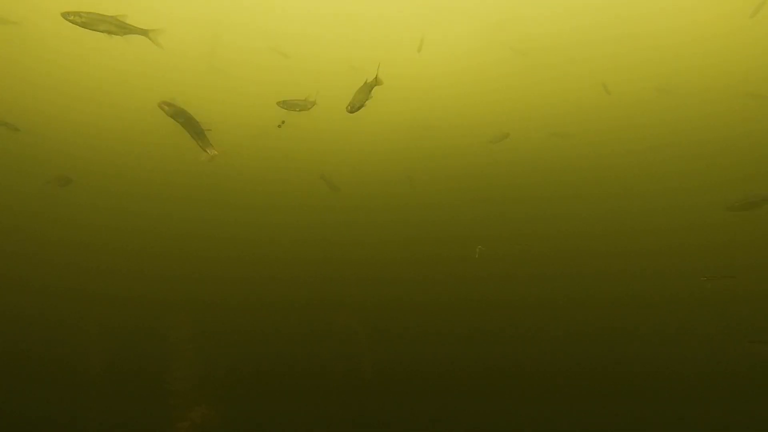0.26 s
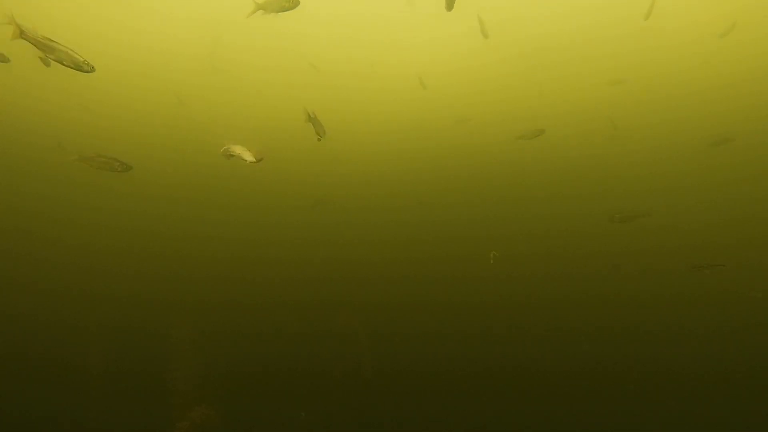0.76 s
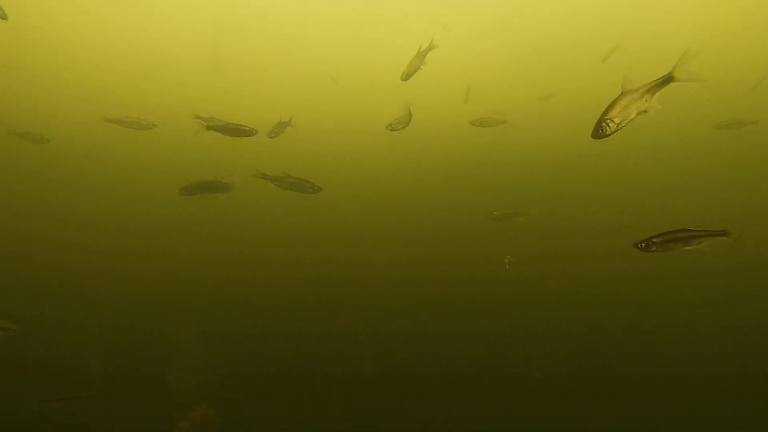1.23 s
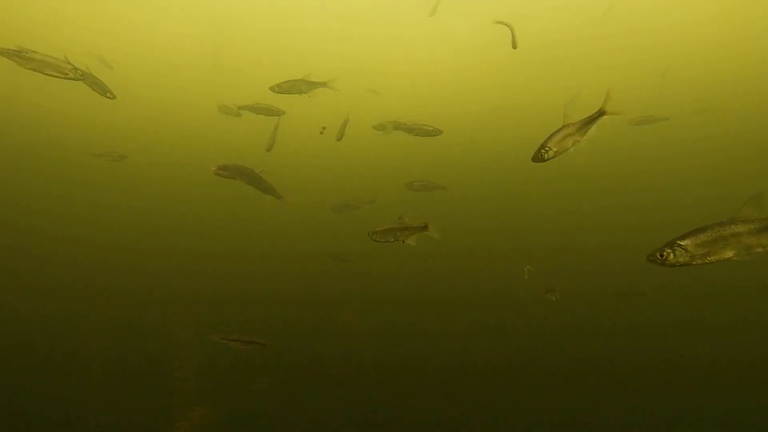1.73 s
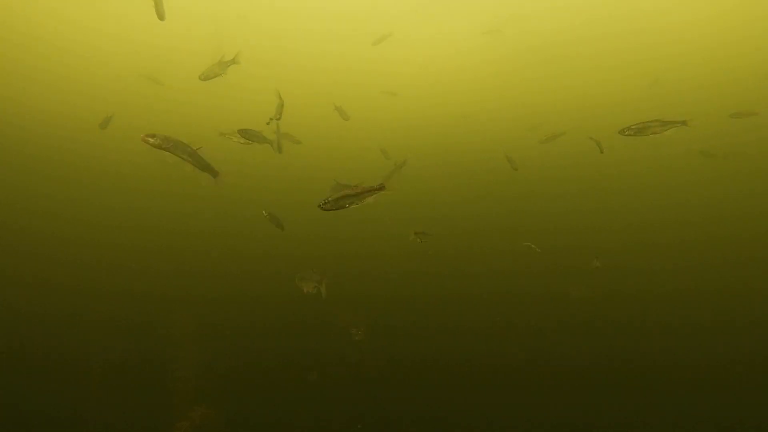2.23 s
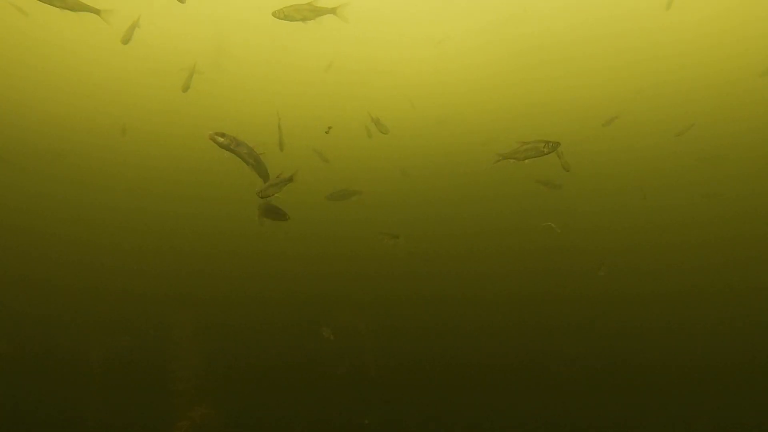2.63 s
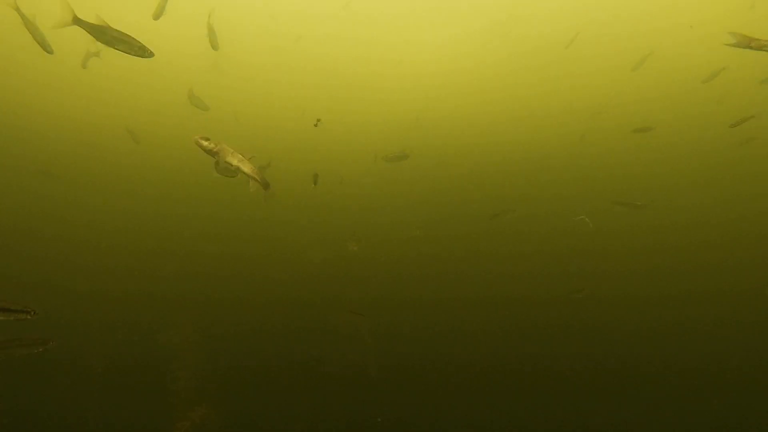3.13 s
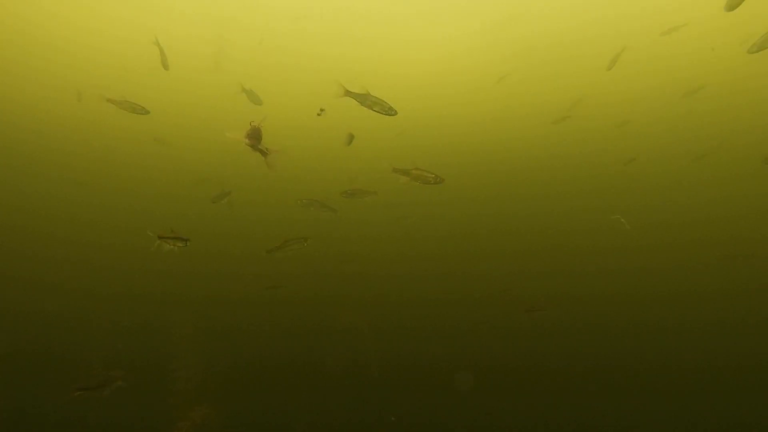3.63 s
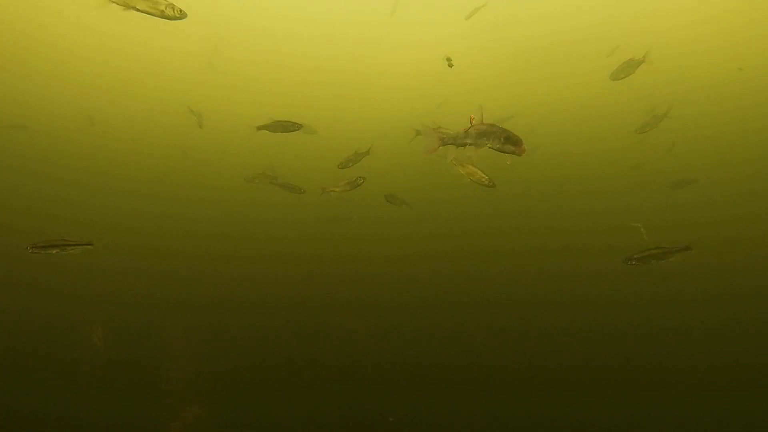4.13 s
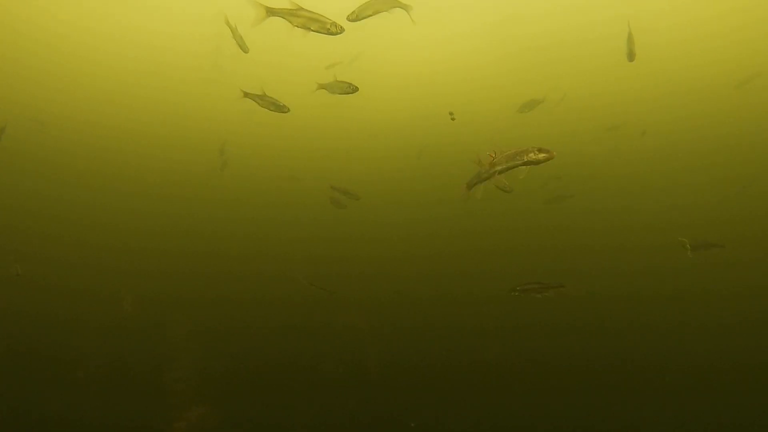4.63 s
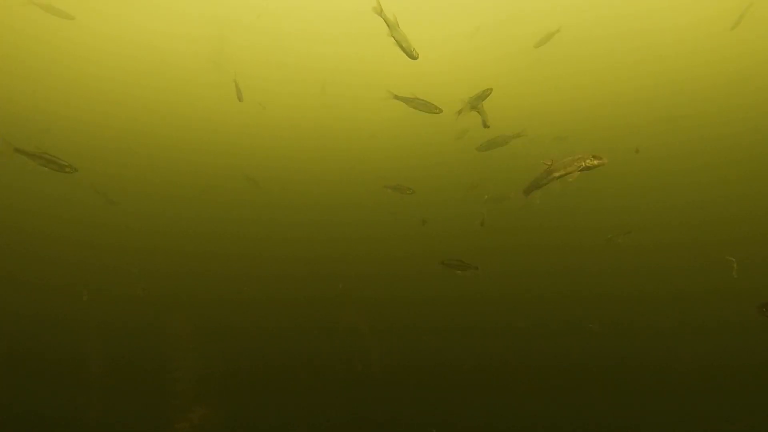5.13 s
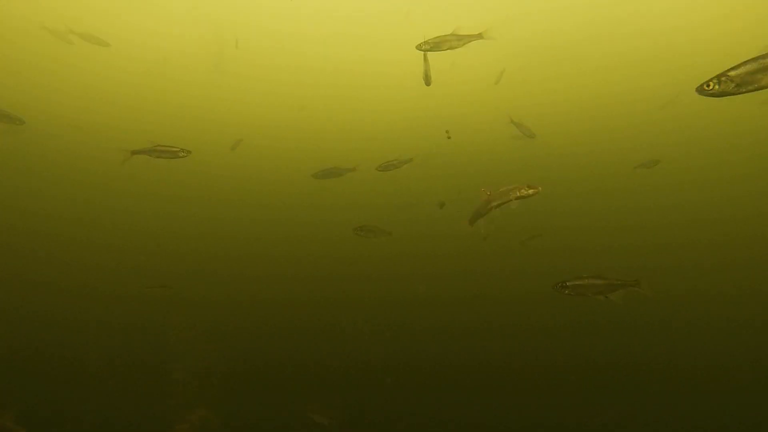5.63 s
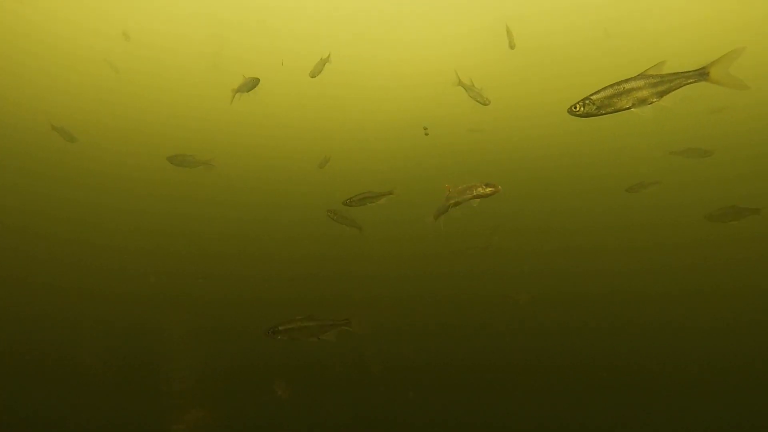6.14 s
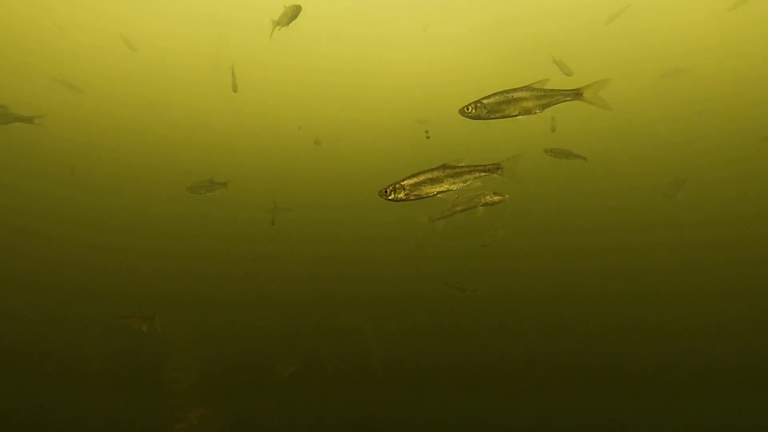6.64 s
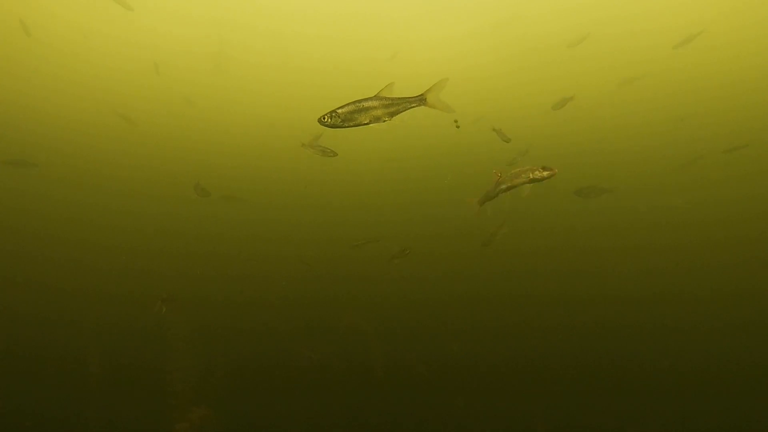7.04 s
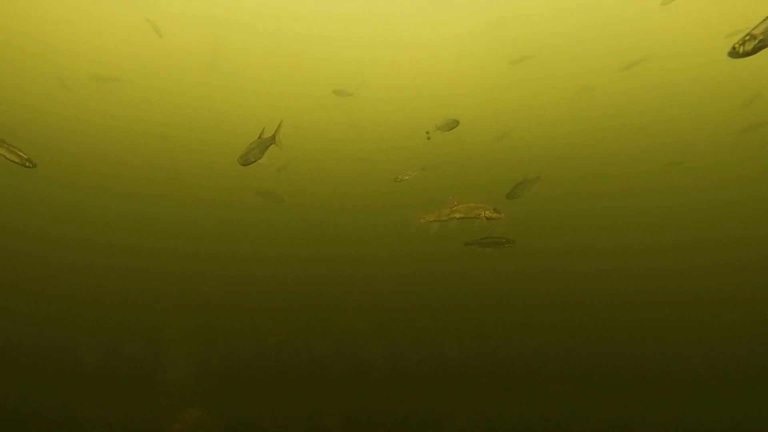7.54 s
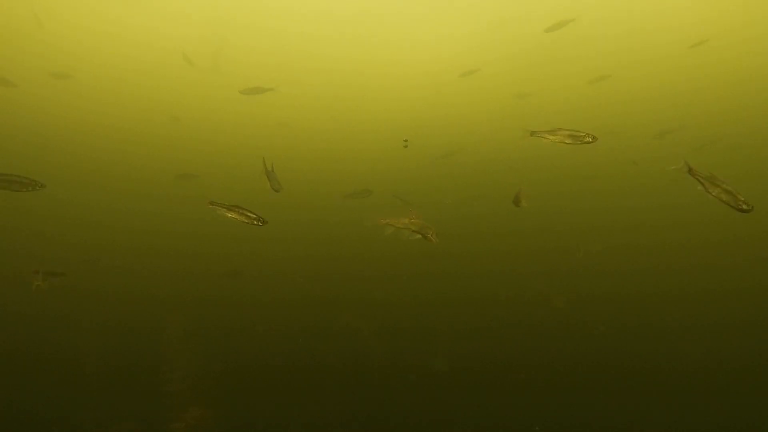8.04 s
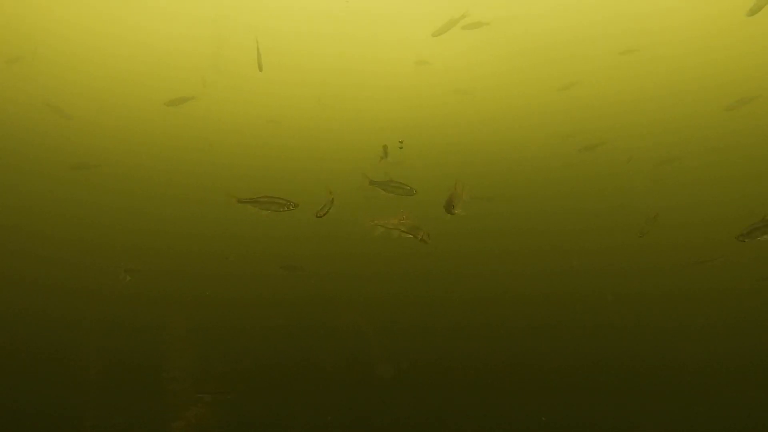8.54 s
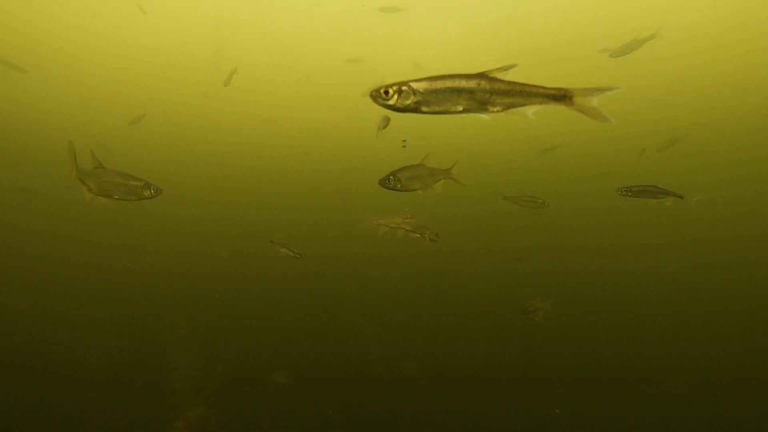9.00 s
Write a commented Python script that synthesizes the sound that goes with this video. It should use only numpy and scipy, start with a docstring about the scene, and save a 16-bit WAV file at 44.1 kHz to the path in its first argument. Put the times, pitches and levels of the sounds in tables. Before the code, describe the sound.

Sharp bright ice cracks and quick falling chirps over faint steady hiss, one big tearing crack early on, and fine crackle thickening later underwater.

```python
"""Bright cracks and falling chirps sound from the start under lake ice, over hiss and faint far crackle.
Cracks are filtered noise bursts through the water; chirps are clicks dispersed as bending waves in the ice.
The crackle, which swells later, is random ticks driving the same filters and chirps.
A running crack tears the sheet with dense chirps; brief sine rings and barely dispersed dull snaps are added.
A sealed camera's housing cuts the bass, its microphone hisses, and its gain control dips after loud cracks."""
import sys
import numpy as np
from scipy import signal
from scipy.fft import rfft, irfft
from scipy.io import wavfile
from scipy.ndimage import uniform_filter1d

SR = 44100
rng = np.random.default_rng(int(sys.argv[2]) if len(sys.argv) > 2 else 0)


def wav_record(signal):
    """Record a signal, one row per channel, as 16-bit PCM in the file named by sys.argv[1]."""
    frames = np.transpose(np.atleast_2d(signal))
    bounded = np.clip(frames, -1, 1)
    # unit amplitude maps onto the largest positive 16-bit level
    quanta = np.round(bounded * 32767).astype(np.int16)
    wavfile.write(sys.argv[1], SR, quanta)


N = 408807  # length in samples
CHIRP_SIZE = 4096  # samples in one chirp
CHIRP_CENTRE = CHIRP_SIZE // 4  # sample at which its strongest pitch arrives


def gain_of(db):
    """Logarithmic level: 20 dB is a factor of ten in amplitude."""
    return 10 ** (np.asarray(db) / 20)


def evened(x):
    """Power normalisation: scales to an rms of 1."""
    return x / np.sqrt(np.mean(x ** 2) + 1e-20)


def colour(points, size):
    """Spectral envelope: gain at each FFT bin, dB straight on log frequency, dropping 22 dB or more outside."""
    point_hz, point_db = np.transpose(points)
    hz = np.fft.rfftfreq(size, 1 / SR)
    db = np.interp(np.log(hz + 1), np.log(point_hz), point_db, point_db[0] - 22.5, point_db[-1] - 22.0)
    return gain_of(db)


def causal(points):
    """Minimum phase: filter taps of energy 1, whose ringing follows the onset and never precedes it."""
    log_gain = np.log(colour(points, 1024))
    both_sides = np.concatenate([log_gain, log_gain[-2:0:-1]])
    # the Hilbert transform of the log gain gives the phase
    taps = np.fft.ifft(np.exp(np.conj(signal.hilbert(both_sides)))).real[:512]
    return taps / np.linalg.norm(taps)


def add(mix, s, sound):
    """Superposition: adds a sound to the mix at time s, trimmed to fit."""
    at = round(s * SR)
    part = mix[max(at, 0):][:len(sound) + min(at, 0)]
    part += sound[max(-at, 0):][:len(part)]


# Colours of a burst, from low to high. Each row: frequency in Hz, relative level in dB.
LOW_RING = [(1200, -41.5), (1500, -22.5), (2450, -20.5), (2750, -3.5), (2950, -0.5), (3400, -6.5),
            (4200, -17.5)]
MID_RING = [(2600, -25.5), (3600, -7.5), (5000, -2.5), (5800, 2.5), (6500, -5), (8000, -20)]
TREBLE = [(3000, -34.5), (6200, -16.5), (7000, -2), (8000, 5.5), (9000, -1), (9800, -12.5), (11500, -17.5),
          (13000, -39.5)]
TOP_OCTAVE = [(8500, -24.5), (10500, 0), (13000, -4), (13900, -9.5), (15000, 1.5), (15700, -0.5),
              (15950, -35.5)]


def through_water(drives):
    """Linear filtering: the low ring, middle ring, treble and top octave each colour one drive signal."""
    colours = (LOW_RING, MID_RING, TREBLE, TOP_OCTAVE)
    return sum(signal.oaconvolve(drive, causal(points))[:N] for drive, points in zip(drives, colours))


# Bursts through the water. Each row: start in seconds, level in dB, length in ms,
# 3 kHz ring relative to the treble in dB.
CRACKS = [(0.0084, -39.5, 8.5, -9.5), (0.056, -43.5, 7.3, -10.5), (0.1122, -57, 5.8, -19),
          (0.132, -41.5, 6.9, -10), (0.1907, -49, 7.8, -7), (0.2276, -56, 5.7, -16),
          (0.2448, -45.5, 5.9, 1), (0.3156, -45, 6.8, -7), (0.4227, -57.5, 7.3, 2), (0.4447, -53.5, 8, -18),
          (0.5156, -44.5, 4.7, -18), (0.615, -19, 5.5, -18), (0.625, -36.5, 5, -2), (0.629, -43, 3.7, -14),
          (0.636, -44, 7.5, -23), (0.6583, -44, 7, -15), (0.6806, -39, 7.2, -14.5), (0.696, -54, 3.1, -22),
          (0.8111, -58, 7.8, -22), (0.9954, -38, 6.4, -13.5), (1.6372, -57, 6, -23), (1.707, -32, 7, -8.5),
          (1.7681, -30, 7.3, -9.5), (1.873, -54.5, 5.9, 11), (2.2202, -52.5, 14, 6),
          (2.608, -17, 16.6, -4.5), (2.6229, -16, 22.6, -4.5), (2.649, -23.5, 28, -11.5),
          (2.658, -25, 8, -9), (2.6688, -20, 10.8, -5), (2.6814, -26, 14.4, -11.5),
          (2.7021, -27.5, 9.2, -13), (2.7177, -24.5, 15.5, -13.5), (2.7362, -25, 4.9, -7.5),
          (2.7461, -29, 9.4, -11.5), (2.762, -40, 10, -13), (2.7781, -40.5, 11.7, -19),
          (2.798, -24, 12.6, -3), (2.8144, -31, 9.9, -9), (2.8245, -36.5, 18, -12.5),
          (2.8506, -39, 6.4, -19), (2.862, -39.5, 9, -6), (2.874, -38, 6.3, -12), (2.883, -35, 7, -10),
          (2.8957, -42, 9, -10), (2.9074, -36, 10.5, -11.5), (2.9604, -41, 3.5, -16),
          (2.9855, -38.5, 5.5, -16), (3.017, -39, 13, -10.5), (3.038, -47, 6, 8), (3.094, -32.5, 8.9, -5.5),
          (3.1829, -45, 5.3, 4), (3.2488, -45, 15, 1), (3.288, -50, 15.6, 1.3), (3.369, -55, 6.1, 0.5),
          (3.4946, -47.5, 1.9, -2), (3.617, -59, 10.5, 2.3), (3.748, -45.5, 9.9, -3),
          (3.86, -27.5, 6, -5.5), (3.9277, -51.5, 11, 1.5), (3.977, -57, 7.6, 8), (4.0546, -44, 6.3, -9),
          (4.1618, -56, 7.7, -9), (4.218, -48, 8.8, -1.5), (4.4433, -58.5, 6.3, -21),
          (4.622, -43.5, 4.3, -6), (4.738, -46, 5.2, -4), (4.8186, -51, 2.1, -8), (4.959, -51, 5.3, 6),
          (5.074, -43.5, 7.6, -8), (5.4198, -35.5, 20, -6), (5.4328, -27.5, 8.3, -5), (5.4467, -22, 3, -17),
          (5.451, -39, 19, -7.5), (5.465, -45, 14, -13), (5.4793, -40, 8.9, -9), (5.8238, -45, 6, -6.5),
          (5.843, -51, 7.5, -9), (5.879, -53, 5.2, -16), (5.9243, -43.5, 6.7, 2), (5.9469, -37.5, 3.7, -15),
          (5.954, -46, 12, 3), (5.9748, -49.5, 18, 3), (6.0035, -48.5, 17, -2.5), (6.0656, -42.5, 3.6, 0),
          (6.091, -41.5, 5.2, 8), (6.106, -45, 19, 1), (6.1412, -45, 8.2, -13), (6.1527, -39.5, 5.8, 12),
          (6.162, -51, 24.5, 9), (6.2542, -47, 23.4, 4.5), (6.3916, -44.5, 2.3, 0), (6.4613, -52.5, 7, -13),
          (6.495, -53.5, 26, -14), (6.522, -50, 12, -12), (6.554, -55.5, 28, -12), (6.591, -41, 1.9, -17.5),
          (6.69, -33, 6.6, -2), (6.788, -58.5, 8, -8), (6.987, -53, 3.7, -20), (7.19, -53.5, 7, -6.5),
          (7.3257, -22, 3.8, -7.5), (7.335, -39.5, 3, -16), (7.5916, -55, 7.9, 3), (7.621, -51.5, 8.6, -10),
          (7.9019, -51.5, 8.5, -13), (8.092, -61, 12, -19), (8.148, -57, 14, -13), (8.2074, -50, 8.5, -9),
          (8.3006, -56, 19, -12), (8.3354, -48.5, 5.5, -14), (8.4707, -41.5, 3.7, -9),
          (8.4964, -52, 7.5, -16), (8.5203, -51, 11, -16), (8.5683, -38, 10.4, -9.5),
          (8.6206, -44, 8.3, -8), (8.675, -56, 8, 6), (8.6881, -45.5, 9.4, 11), (8.819, -42.5, 5, -6),
          (8.8783, -39, 14.5, -1), (8.909, -38.5, 7.4, 0.6), (8.9195, -44.5, 12, 2),
          (8.9907, -49.5, 6.3, -8), (9.0283, -46.5, 6.3, -6), (9.0604, -45, 6, 6),
          (9.1179, -37.5, 9.4, -6.5), (9.1364, -40, 10.4, -15), (9.189, -45.5, 8.4, -1),
          (9.2258, -48.5, 4.8, -6), (9.255, -44, 9.7, 3.5)]
# Envelopes of the low ring, middle ring, treble and top octave. The low ring builds slowest and the
# top octave fastest; both lower rings fade more slowly than the treble.
# Each row: rise, length, both as shares of the crack's length.
BUILD = [(0.16, 1.21), (0.082, 1.24), (0.09, 0.93), (0.024, 0.75)]
# Far cracks lose their top octave. Each row: time in seconds, its level relative to the treble in dB.
TOP_LEVEL = [(0, -9), (.6, -18), (2.6, -12), (5.75, -13), (6.35, -21), (6.6, -11.5), (8.35, -29.5),
             (8.5, -14.5), (9.27, -13)]
# the 5.5 kHz ring follows the 3 kHz ring in part, and varies by chance
MID_DB, MID_FOLLOWS, MID_SPREAD_DB = 0.45, .38, 2


def cracks():
    """Reverberant decay: echoes between ice and lake bed keep a lumpy noise burst up, then it dies fast."""
    ms = np.arange(2000) / SR * 1000
    noise, lumps = rng.standard_normal((len(CRACKS), 2, len(ms))).transpose(1, 0, 2)
    drives = np.zeros((4, N))
    for (s, db, length, low_db), n, lump in zip(CRACKS, noise, lumps):
        burst = gain_of(2.8 * evened(uniform_filter1d(lump, 24))) * n
        burst *= 1 + 1.6 * np.exp(-ms / 0.56)  # the direct path lands first
        burst *= gain_of(db) / np.std(burst[ms < length / 2])
        mid_db = MID_DB + MID_FOLLOWS * low_db + MID_SPREAD_DB * lump[-1]
        top_db = np.interp(s, *np.transpose(TOP_LEVEL))
        shares = gain_of([low_db, mid_db, 0, top_db])
        shares = shares / np.linalg.norm(shares)
        for drive, share, (rise, last) in zip(drives, shares, BUILD):
            gone = ms / (last * length)
            scattered_tail = gain_of(-22 - 26.0 * gone)
            body = gain_of(-11.0 * gone - 5.1 * gone ** 3) + scattered_tail
            onset = 1.15 - np.exp(-ms / (rise * length))
            add(drive, s, share * burst * body * onset)
    return through_water(drives)


def chirp(hz, spread, octaves):
    """Dispersion: bending waves travel as the root of frequency, so a click arrives treble first."""
    f = np.fft.rfftfreq(CHIRP_SIZE, 1 / SR) + 1
    bump = np.exp(-abs(np.log2(f / hz) / (0.77 * octaves)) ** 1.4)
    # phase whose delay falls as 1 / sqrt(f), and is zero at the strongest pitch
    turns = spread / 1000 * (2 * np.sqrt(1000 * f) - f * np.sqrt(1000 / hz))
    wave = np.roll(irfft(bump * np.exp(-2j * np.pi * turns)), CHIRP_CENTRE)
    return wave / np.sqrt(uniform_filter1d(wave ** 2, 300).max())  # loudest 300 samples at rms 1


def scattered(wave, noise, share=0.058, ms=3.3):
    """Scattering: flaws and edges in the sheet blur a wave with a decaying noise tail."""
    t_ms = np.arange(len(noise)) / SR * 1000
    direct = t_ms == 0
    return signal.fftconvolve(wave, share * noise * np.exp(-t_ms / ms) + direct)


# Bending waves in the ice. Each row: arrival of the strongest pitch in seconds, level in dB,
# strongest pitch in Hz, spread (travel delay at 1 kHz) in ms.
BENDS = [(0.0144, -66, 1580, 9), (0.6189, -38.5, 730, 3.2), (0.664, -67, 1700, 3), (1.716, -51, 700, 8.1),
         (1.775, -54.5, 774, 6.8), (2.6165, -29, 556, 3.55), (2.678, -46, 618, 9.8), (2.824, -68, 230, 3.1),
         (2.8356, -61, 218, 3.7), (3.103, -52.5, 580, 6.8), (3.8652, -44.5, 800, 4.3),
         (5.456, -57.5, 302, 3.16), (5.8204, -74, 313, 5.2), (5.98, -70.5, 232, 5.7),
         (6.023, -66.5, 463, 7.9), (6.141, -73, 225, 3.3), (6.19, -75, 230, 3.7), (6.2797, -61.5, 360, 9.7),
         (6.5158, -73.5, 226, 3.4), (6.6961, -56.5, 1610, 10.8), (7.6308, -62.5, 664, 11),
         (8.1676, -74.5, 230, 4), (8.2662, -77, 229, 2.7), (8.4411, -68, 241, 4.6), (8.477, -72, 904, 6),
         (8.542, -70, 229, 4.4), (8.5804, -56.5, 460, 7), (8.6281, -65.5, 590, 6.4), (8.69, -73, 180, 1.6),
         (8.9066, -68, 279, 3.7), (8.925, -68.5, 200, 2.4), (8.944, -74, 290, 4), (9.0, -66.5, 286, 3.1),
         (9.037, -69, 190, 4.1), (9.0712, -66, 228, 4.7), (9.1083, -69, 290, 3), (9.136, -52, 474, 12.3),
         (9.2073, -68, 370, 5.8), (9.222, -73, 280, 2.9)]
# higher waves cover more octaves: nominal width at 500 Hz, and the power of pitch by which it grows
BEND_OCTAVES, WIDENING = 1.57, .4


def bends():
    """Flexural waves: dispersion in the ice sheet draws a click out into a falling chirp."""
    out = np.zeros(N)
    for (s, db, hz, spread), n in zip(BENDS, rng.standard_normal((len(BENDS), 600))):
        wave = chirp(hz, spread, BEND_OCTAVES * (hz / 500) ** WIDENING)
        add(out, s - CHIRP_CENTRE / SR, gain_of(db) * scattered(wave, n))
    return out


# Crackle too dense to tell apart. Each row: time in seconds, burst level in dB, bending level in dB.
DENSE_CRACKLE = [(0.0, -82, -104), (0.41, -79, -100), (1.14, -78.5, -102), (1.59, -77, -98),
                 (1.8, -83.5, -96), (2.9, -69.5, -99), (3.1, -78, -102.5), (3.6, -72.5, -91.5),
                 (5.4, -78, -95), (5.73, -66.5, -87.5), (6.02, -60.5, -79), (6.3, -66, -83.5),
                 (6.591, -68, -87), (7.45, -69, -85.5), (8.45, -62.5, -86), (8.92, -68, -79.5),
                 (9.27, -59.5, -79)]


def swarm(per_s=420, spread_db=5.0, smear_ms=2.6, bends_per_s=70, bend_spread_db=3.5):
    """Random point process: many small far cracks, a few larger, with varied colour; some bend the sheet."""
    s, burst_db, bend_db = np.transpose(DENSE_CRACKLE)
    t = np.arange(N) / SR
    chance = rng.random((2, N))
    odds = np.minimum(rng.exponential(1, (2, N)), 3.2)
    # each of the four colours gets its own random share of a tick
    tick_db = spread_db * odds[0] + 6.5 * rng.standard_normal((4, N))
    ticks = gain_of(tick_db) * (chance[0] < per_s / SR)
    level = signal.lfilter([1], [1, -np.exp(-1000 / SR / smear_ms)], ticks)
    drives = evened(level * rng.standard_normal(N)) * gain_of([[-13], [-4], [-2.5], [-15]])
    bursts = through_water(drives)

    kicks = gain_of(bend_spread_db * odds[1]) * (chance[1] < bends_per_s / SR)
    pitch_index = rng.integers(0, 8, N)
    bent = np.zeros(N)
    for k, hz in enumerate(np.geomspace(170, 340, num=8)):
        plop = scattered(chirp(hz, 6.2, 1.2), rng.standard_normal(600), .08, 5.2)
        bent += signal.oaconvolve(kicks * (pitch_index == k), plop)[CHIRP_CENTRE:][:N]
    burst_gain = gain_of(np.interp(t, s, burst_db))
    bend_gain = gain_of(np.interp(t, s, bend_db))
    return burst_gain * bursts + bend_gain * evened(bent)


# one long running crack keeps the sheet bending: it grows to a peak, then dies fast over a slower rattle
TEAR_START_S, TEAR_PEAK_S, TEAR_DB, TEAR_RISE_DB = 2.611, 2.634, -25, 11.5
TEAR_FALL_DB_PER_S, RATTLE_DB, RATTLE_FALL_DB_PER_S = 600, -52, 169.5


def tear(per_s=1200, spread_db=5.0, rattle_per_s=350):
    """Superposed impulses: chirps overlap from the crack's tip, over a sparser, higher rattle of debris."""
    size = gain_of(spread_db * rng.standard_normal(N)) * rng.choice([-1, 1], N)
    chance = rng.random(N)

    def chirps(rate, wave):
        """Shot noise: random impulses at a mean rate per second, each sounding one wave."""
        impulses = size * (chance < rate / SR)
        return evened(signal.oaconvolve(impulses, wave)[CHIRP_CENTRE:][:N])

    crunch = chirps(per_s, chirp(750, 5.0, 1.9))
    rattle = chirps(rattle_per_s, chirp(1100, 3.0, 2.6))
    t = np.arange(N) / SR
    late = np.maximum(t - TEAR_PEAK_S, 0)
    rise_db = TEAR_RISE_DB * np.minimum((t - TEAR_PEAK_S) / (TEAR_PEAK_S - TEAR_START_S), 0)
    falling_crunch = gain_of(TEAR_DB - TEAR_FALL_DB_PER_S * late) * crunch
    falling_rattle = gain_of(RATTLE_DB - RATTLE_FALL_DB_PER_S * late) * rattle
    return (t > TEAR_START_S) * gain_of(rise_db) * (falling_crunch + falling_rattle)


# Short ringing blips. Each row: start in seconds, level in dB, pitch in Hz, rise in ms,
# 60 dB decay time in ms, low thump relative to the ring in dB.
BLIPS = [(2.805, -47.5, 1640, 3.5, 30, -27), (4.0167, -43.5, 1778, 5.6, 14, -1.5),
         (5.441, -22.5, 1644, 0.29, 12.7, -18), (5.4465, -19, 1540, 0.21, 6.9, -16),
         (5.9345, -35.5, 1680, 1.13, 15.6, -25)]


def blips():
    """Damped resonance: brief rings at one pitch, a little roughened, over a lower thump."""
    ms = np.arange(2000) / SR * 1000
    out = np.zeros(N)
    for (s, db, hz, rise, t60, thump_db), n in zip(BLIPS, rng.standard_normal((len(BLIPS), len(ms)))):
        attack = np.sin(np.pi / 2 * np.minimum(ms / rise, 1)) ** 2
        roughness = 0.31 * evened(uniform_filter1d(n, 10))
        ring = np.sin(2 * np.pi * hz * ms / 1000) + roughness
        decay = gain_of(-60 * np.maximum(ms - rise, 0) / t60)
        # the thump falls 60 dB in 28 ms
        thump = gain_of(thump_db - 60 * ms / 28) * np.sin(2 * np.pi * 0.308 * hz * ms / 1000)
        add(out, s, gain_of(db) * attack * (decay * ring + thump))
    return out


# Close, dull snaps. Each row: arrival of the strongest pitch in seconds, peak level in dB,
# strongest pitch in Hz, spread (travel delay at 1 kHz) in ms, nominal width in octaves.
SNAPS = [(5.442, -11.5, 2160, 0.59, 2.2), (5.4472, -15, 1190, 0.74, 2), (7.3231, -23, 1004, 1.37, 1.7),
         (7.3271, -12, 707, 1.4, 2.25), (7.3306, -18.5, 1000, 0.68, 2.4), (7.3327, -20.5, 773, 0.81, 2.9)]


def snaps():
    """Short-path dispersion: right by the camera a crack's click is barely spread in time."""
    out = np.zeros(N)
    for (s, db, hz, spread, octaves), n in zip(SNAPS, rng.standard_normal((len(SNAPS), 200))):
        click = scattered(chirp(hz, spread, octaves), n, .06, 1.0)
        add(out, s - CHIRP_CENTRE / SR, gain_of(db) * click / abs(click).max())
    return out


def scene():
    """Superposition: all the ice sounds sum at the housing, in one channel."""
    return (cracks() + bends() + swarm() + tear() + blips() + snaps())[None]


# Microphone hiss inside the housing. Each row: frequency in Hz, relative level in dB.
HISS_COLOUR = [(20, -16), (60, -8.5), (300, -10), (420, -10.5), (1300, -17), (1500, -3), (2200, -5),
               (3900, -14.5), (5700, -8.5), (6800, -7.5), (8100, 0), (10800, -16.5), (15750, -16.5),
               (15950, -45)]
HISS_DB, BASS_CUT_HZ, EDGE_HZ = -70, 120, 16800


def hiss():
    """Stationary noise: white noise shaped in the frequency domain."""
    spectrum = rfft(rng.standard_normal(N)) * colour(HISS_COLOUR, N)
    return gain_of(HISS_DB) * evened(irfft(spectrum, N))


def gain_control(wet):
    """Dynamic compression: the gain dips after loud cracks by 0.17 dB for each dB over the threshold."""
    # the shifted windows look back, so the gain follows the sound
    power_db = 10 * np.log10(abs(uniform_filter1d(wet[0] ** 2, 200, origin=99)) + 1e-12)
    fall_db = np.arange(N) * 60. / SR  # the held peak falls 60 dB a second
    held_db = np.maximum.accumulate(power_db + fall_db) - fall_db
    over_db = np.maximum(held_db + 38.5, 0)  # threshold -38.5 dB
    return wet / gain_of(0.17 * uniform_filter1d(over_db, 300, origin=149))


def record(dry):
    """Transmission chain: the housing cuts the bass, hiss joins, gain control dips, the band is limited."""
    housed = signal.sosfilt(signal.butter(3, BASS_CUT_HZ, "high", fs=SR, output="sos"), dry)
    ducked = gain_control(housed + hiss())
    band_limit = signal.firwin(511, EDGE_HZ, window=("kaiser", 9), fs=SR)
    return signal.oaconvolve(ducked, band_limit[None], "same")


dry = scene()
out = record(dry)
wav_record(out)
```